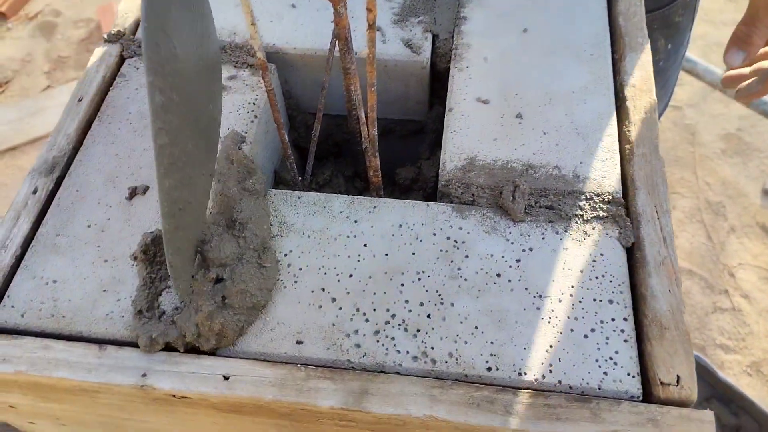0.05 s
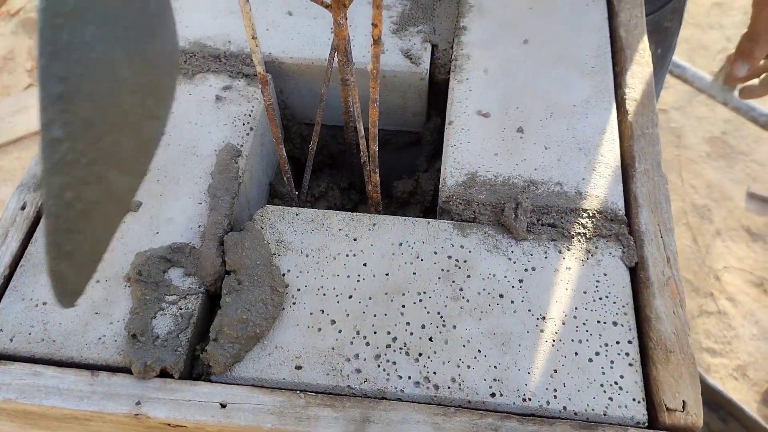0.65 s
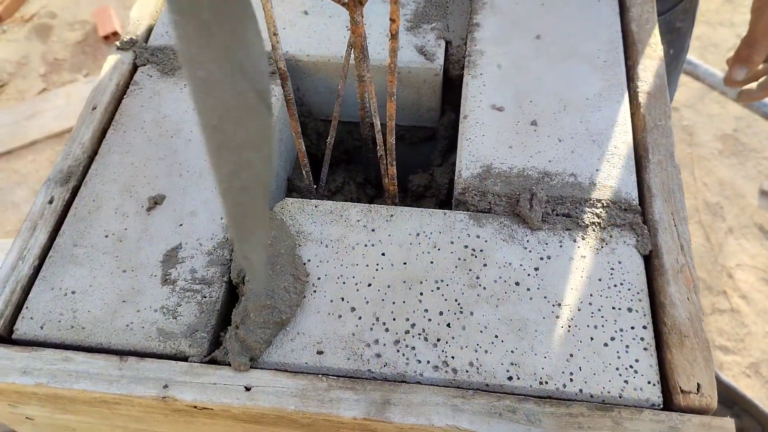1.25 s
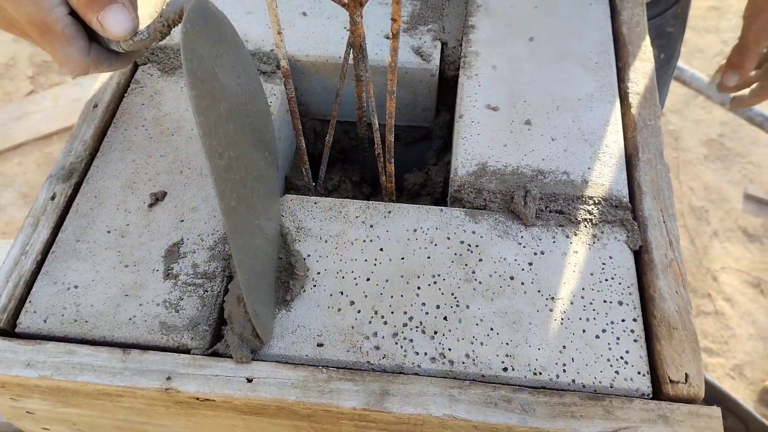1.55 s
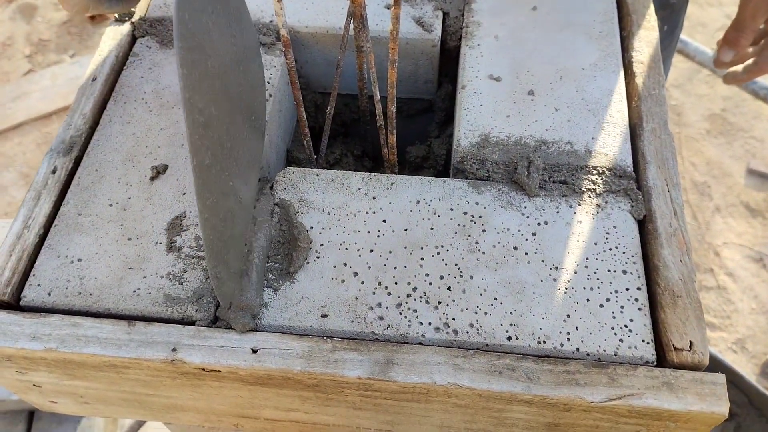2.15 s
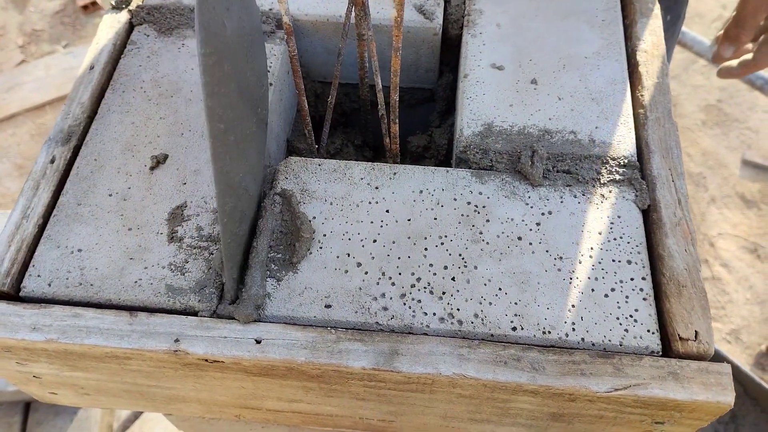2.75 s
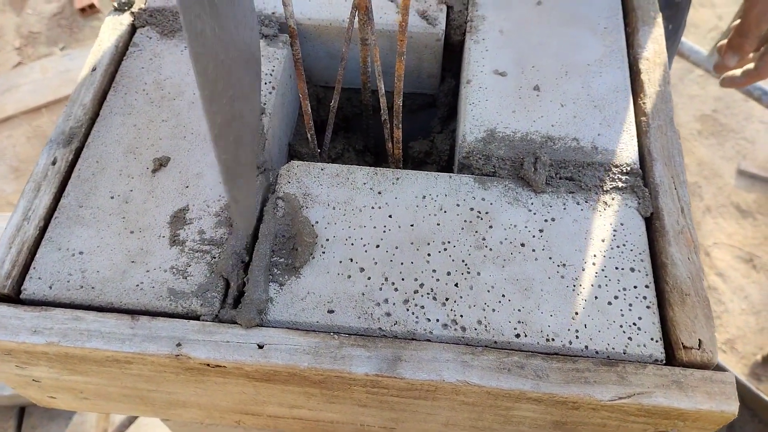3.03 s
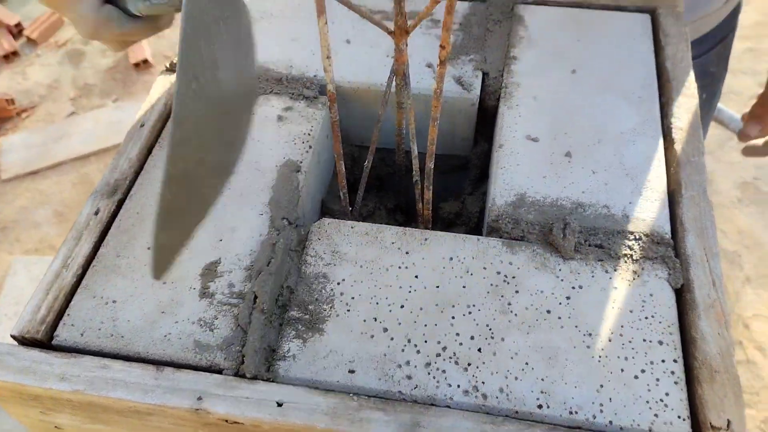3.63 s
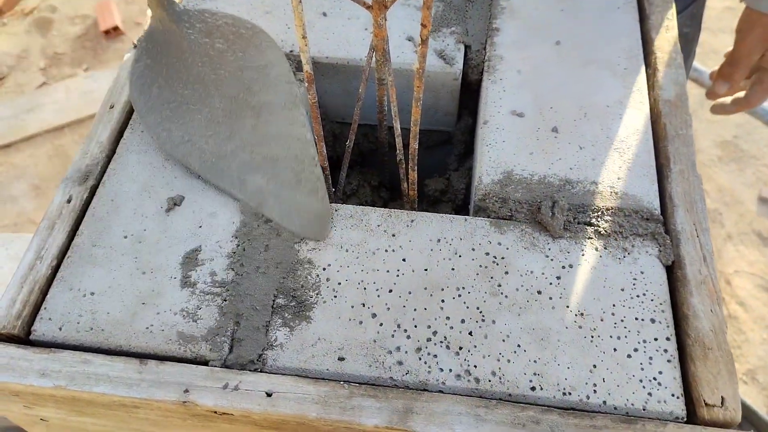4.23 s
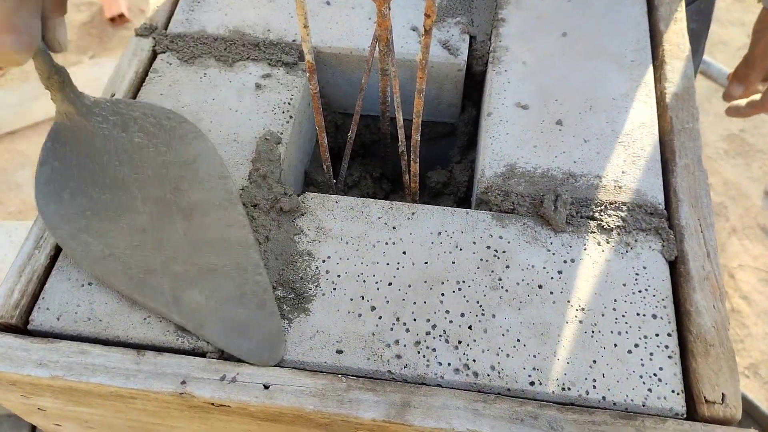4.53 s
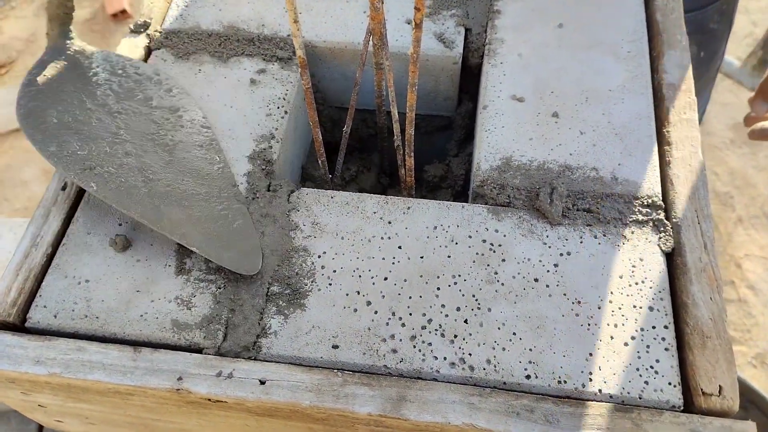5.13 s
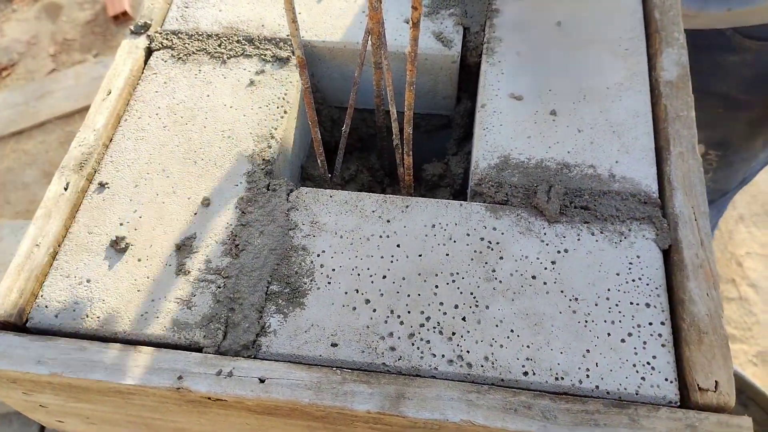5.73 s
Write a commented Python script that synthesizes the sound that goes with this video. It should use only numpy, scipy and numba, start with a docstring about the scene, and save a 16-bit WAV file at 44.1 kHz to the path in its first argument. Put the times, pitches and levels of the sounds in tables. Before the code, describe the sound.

Close, gritty scraping and wet chopping of a trowel working mortar between concrete blocks, its steel blade clinking and briefly ringing.

```python
"""Gritty scrapes, wet chops and steel clinks, close by: a trowel works mortar between two concrete blocks.
Its point chops and slices through the wet joint, then its long edge scrapes the dry block faces clean.
Sand catches under the steel and sets the blade ringing: damped while pressed down, freely once it lifts.
The hollow block knocks and resonates, a steel rod hums faintly near the end, and a light breeze blows."""
import sys
import numpy as np
from scipy import signal
from scipy.fft import rfft, irfft
from scipy.io import wavfile
from scipy.ndimage import uniform_filter1d, minimum_filter1d
from numba import njit

SR = 44100
rng = np.random.default_rng(int(sys.argv[2]) if len(sys.argv) > 2 else 0)


def waveform_to_disk(signal):
    """Save audio, clipped to [-1, 1], as 16-bit WAV at the path in sys.argv[1]."""
    frames = np.transpose(np.atleast_2d(signal))
    scaled = np.clip(frames, -1, 1) * 32767
    samples = np.round(scaled).astype(np.int16)
    wavfile.write(sys.argv[1], SR, samples)


N = 254879
TIME = np.arange(N) / SR

# ringing modes of the blade: pitch_hz, free_t60_s, point_contact_db, edge_contact_db
BLADE_MODES = [(1770, .23, -4, -3), (2400, .02, -28, -13), (2640, .1, -15, -17), (3650, .1, -20, -7.5),
               (4080, .08, -17, -20), (4700, .035, -23, -8), (5530, .06, -18, -9), (5960, .04, -24, -9),
               (7010, .06, -14, -1.5), (7330, .08, -11, -15), (8640, .05, -12, -5), (9230, .05, -11, -14),
               (10400, .06, -12, -9), (12480, .04, -18, -7), (12950, .025, -24, -11),
               (14450, .05, -18, -4.5)]
# the point chops into the joint and pulls out with a hiss:
# start_s, scrape_db, crunch_db, pull_db, pull_fall_s, wetness (0-1)
CHOPS = [(0.173, -23.5, -31.5, -43.5, 0.046, 0), (0.397, -30.5, -44.5, -63, 0.0089, 0.35),
         (1.362, -50, -29.5, -66, .02, 0.15), (1.768, -27, -43.5, -48, 0.09, 0.3),
         (1.98, -27, -49.5, -47, 0.029, 0.45), (2.197, -25.5, -35, -51, 0.058, 0.29),
         (2.382, -23.5, -44, -46, 0.08, 0.41), (2.6, -23, -38, -50, 0.15, 0.44),
         (2.762, -29.5, -43.5, -44, 0.032, 0.38)]
CHOP_RISE_S = 0.022
# the blade sweeps over mortar and block, swelling and then easing off:
# start_s, rise_s, fall_s, swell_db, sag_db, scrape_db, crunch_db, wetness (0-1)
SWEEPS = [(0.0, 0.0071, 0.073, 1, 12.5, -46, -56, 0.53), (0.093, 0.063, 0.033, 25, 10.5, -30.5, -47, 0.11),
          (0.469, .014, 0.052, 21.5, 35.5, -29.5, -37, 0.02),
          (0.713, 0.026, 0.032, 10, 26, -31.5, -28, 0.1), (0.794, 0.066, 0.098, 14.5, 24.5, -25, -23, 0),
          (0.96, 0.035, 0.041, -9, 1, -58, -71, 0.41), (1.265, 0.031, 0.02, -2.5, 20, -29.5, -39, 0.33),
          (1.432, 0.083, 0.054, 4.5, -1, -43.5, -41, 0.09), (1.58, 0.036, 0.021, -2, 9, -54.5, -81, 0.39),
          (3.17, 0.016, 0.049, -4, 8, -29.5, -34, 0.06), (3.233, 0.058, 0.078, 23, 27, -10, -23, 0.08),
          (3.359, 0.032, 0.13, 4.5, 36, -25, -24.5, 0.17),
          (3.475, 0.0073, 0.08, 12, 24.5, -27.5, -26, 0.38), (3.569, 0.038, 0.012, 8, 8, -38, -37.5, 0.43),
          (3.803, 0.055, 0.019, 25.5, 4, -40, -39, 0.94), (3.919, 0.0022, 0.033, -2, 8.5, -26, -37.5, 0.34),
          (3.959, 0.055, 0.051, 27, 15.5, -9, -38, 0.08), (4.051, 0.01, 0.084, 6, 14, -12, -44, 0.12),
          (4.158, 0.077, 0.055, -2, 1, -23, -63, 0.39), (4.485, 0.0029, 0.026, -13.5, 14, -42.5, -39, 0),
          (4.517, 0.053, 0.09, 8.5, 15.5, -12.5, -50, 0.11),
          (4.665, 0.0095, 0.08, -5, 16.5, -52.5, -52.5, 0.3),
          (4.84, 0.057, 0.0091, 5.5, 2.5, -9, -44.5, 0.15), (4.918, 0.026, 0.013, -4, 14, -20, -49, 0),
          (5.099, 0.0025, 0.012, 4, 14, -22.5, -41, 0.24),
          (5.124, 0.01, 0.062, 12.5, 28.5, -14.5, -44.5, 0)]


def from_db(db):
    """Decibels to gain."""
    return 10 ** (np.asarray(db) / 20)


def unit_power(x):
    """Scale to an RMS of 1."""
    return x / np.sqrt(np.mean(x ** 2) + 1e-20)


def smooth(x, decay_s):
    """One-pole lag: every click dies away with this time constant."""
    pole = np.exp(-1 / (decay_s * SR))
    return signal.lfilter([1 - pole], [1, -pole], x + 1e-18)


def drift(turns_per_s):
    """A random wander of unit power."""
    knots = rng.standard_normal(8192)
    return unit_power(np.interp(TIME * turns_per_s, np.arange(len(knots)), knots))


def colour(x, spectrum, size=4096):
    """Minimum-phase EQ through (freq_hz, level_db) points; white noise keeps its power."""
    hz, db = np.transpose(spectrum)
    grid_hz = np.maximum(np.arange(size // 2 + 1) * SR / size, 1)
    cepstrum = irfft(np.log(from_db(np.interp(np.log(grid_hz), np.log(hz), db))))
    causal = (np.arange(size) > 0) & (np.arange(size) < size // 2)
    response = irfft(np.exp(rfft(2 * cepstrum * causal)))
    return signal.fftconvolve(x, response / np.linalg.norm(response))[:N]


def clicks(times_s, levels_db):
    """One click at each time."""
    out = np.zeros(N)
    out[(np.asarray(times_s) * SR).astype(int)] = from_db(levels_db)
    return out


def grains(per_s, spread_db):
    """Random tiny fractures of uneven size, at unit power."""
    sizes = from_db(spread_db * np.minimum(rng.exponential(1, N), 4))
    return unit_power((rng.random(N) < per_s / SR) * sizes * rng.choice([-1, 1], N))


def stick_slip(per_s, spread_db, decay_s):
    """Friction catches and lets go: power comes in quickly dying bursts, even on average."""
    power = smooth(grains(per_s, spread_db) ** 2, decay_s)
    return power / (uniform_filter1d(power, size=900) + 0.35)


@njit
def resonate(force, width_hz, pitch_hz):
    """A mode whose bandwidth and pitch may change at every sample."""
    out, state = np.zeros(len(force)), 0j
    for i in range(len(force)):
        state = state * np.exp(np.pi * (2j * pitch_hz[i] - width_hz[i]) / SR) + force[i]
        out[i] = state.real - force[i] / 2   # keeps bass from leaking through
    return out


def outdoors():
    """A quiet open site: faint air, a light breeze and a few soft bumps on the microphone."""
    # wind rumble and air hiss: freq_hz, level_db
    wind_eq = [(15, 4), (30, 4), (60, -3.5), (180, -21), (400, -42.5), (2000, -91)]
    air_eq = [(100, -10.5), (800, -22.5), (3000, -29.5), (6500, -28), (15000, -33)]
    # soft bumps: start_s, level_db
    bump_hits = [(0.28, -42.5), (1.669, -43), (2.897, -41), (3.607, -37), (5.399, -34.5)]
    bump_s = 0.0032
    bumps = smooth(smooth(clicks(*np.transpose(bump_hits)), bump_s), bump_s) * np.e * bump_s * SR
    gusts = from_db(-55 + 3 * drift(14))
    rumble = (gusts + bumps) * colour(rng.standard_normal(N), wind_eq)
    return rumble + from_db(-67.5) * colour(rng.standard_normal(N), air_eq)


def reflections(x, t60_s=0.11, delay_s=0.003):
    """Nearby blocks and boards throw back a very short, faint wash."""
    response = rng.standard_normal(N) * from_db(-60 * TIME / t60_s) * (TIME > delay_s)
    return from_db(-23) * signal.fftconvolve(x, response / np.linalg.norm(response))[:N]


def rustle(peak_s=5.48, width_s=0.12):
    """A faint rustle swells and fades once the trowel is lifted away."""
    # tone of the rustle: freq_hz, level_db
    rustle_eq = [(500, 0.5), (3500, -10.5), (6700, 0.5), (10000, -12)]
    swell = np.exp(-((TIME - peak_s) / width_s) ** 2)
    return from_db(-62) * swell * colour(grains(per_s=12000, spread_db=4.0), rustle_eq)


def rod_hum(start_s=4.56):
    """A thin reinforcing rod hums faintly after a shove."""
    # bending modes: pitch_hz, t60_s, level_db
    rod_modes = [(480, 1.1, -55), (565, 1.0, -51)]
    age = np.maximum(TIME - start_s, 0)
    return sum(from_db(db - 60 * age / t60) * np.sin(2 * np.pi * hz * age) for hz, t60, db in rod_modes)


def block_cavity(force):
    """The hollow of the block rings briefly under whatever works on its face."""
    # cavity modes: pitch_hz, width_hz, level_db
    cavity_modes = [(373, 120, -12), (513.3, 160, -2.5), (790, 100, -4.5), (954, 140, -5.5),
                    (1243, 48, -8.5)]
    out = np.zeros(N)
    for hz, width, db in cavity_modes:
        ring = resonate(force, np.full(N, float(width)), np.full(N, float(hz)))
        out += from_db(db) * np.sqrt(4 * np.pi * width / SR) * ring
    return out


def block_thuds(decay_s=0.005):
    """Harder blows draw a dull knock from the block itself."""
    # blows: start_s, level_db
    blows = [(0.1913, -16), (0.423, 2.5), (0.477, -16.5), (1.377, -6), (2.207, -14), (3.2, -9),
             (3.254, -8.5)]
    # tone of the concrete: freq_hz, level_db
    block_eq = [(150, -20.5), (500, -7), (1150, 8), (1400, -6), (2500, -4), (6000, -36)]
    envelope = smooth(clicks(*np.transpose(blows)), decay_s) * decay_s * SR
    return from_db(-17) * colour(envelope * rng.standard_normal(N), block_eq)


def grinding(start_s=3.32, length_s=0.27):
    """Small stones in the mortar roll between the flat of the blade and the block in low, uneven lumps."""
    # tone of the grind: freq_hz, level_db
    grind_eq = [(50, -2.5), (150, -1), (600, -9.5), (2000, -29.5)]
    pressed = smooth(1.0 * ((TIME > start_s) & (TIME < start_s + length_s)), 0.003)
    lumps = np.sqrt(stick_slip(per_s=90, spread_db=3.0, decay_s=0.005))
    return from_db(-41) * colour(pressed * lumps * rng.standard_normal(N), grind_eq)


def stroke(start_s, rise_s, fall_s, swell_db, sag_db, land_s=0.0017):
    """One move of the hand: its samples, its effort in dB and its contact as the steel lands and lifts."""
    lift_s, margin_s = 0.0013, 0.06
    length_s = rise_s + fall_s
    first, last = int((start_s - margin_s) * SR), int((start_s + length_s + margin_s) * SR)
    span = np.arange(max(first, 0), min(last, N))
    age = TIME[span] - start_s
    effort_db = np.interp(age, [0, rise_s, length_s], [-swell_db, 0, -sag_db])
    contact = np.exp(np.minimum(age, 0) / land_s - np.maximum(age - length_s, 0) / lift_s)
    return span, effort_db, contact


def hand(release_s=0.00082, pull_after_s=0.081, crunch_follow=0.7):
    """Chops, pull-outs and sweeps add up to two envelopes: steel scrape and mortar crunch."""
    scrape, crunch = np.zeros((2, N))
    for start_s, scrape_db, crunch_db, pull_db, pull_fall_s, _ in CHOPS:
        span, effort_db, contact = stroke(start_s, CHOP_RISE_S, fall_s=0.047, swell_db=16, sag_db=19.5)
        scrape[span] += contact * from_db(scrape_db + effort_db)
        crunch[span] += contact * from_db(crunch_db + effort_db)
        span, effort_db, contact = stroke(start_s + pull_after_s, rise_s=0.048, fall_s=pull_fall_s,
                                          swell_db=6.5, sag_db=14.5)
        scrape[span] += contact * from_db(pull_db + effort_db)
    for *move, scrape_db, crunch_db, _ in SWEEPS:
        span, effort_db, contact = stroke(*move, land_s=0.00017)
        scrape[span] += contact * from_db(scrape_db + effort_db)
        crunch[span] += contact * from_db(crunch_db + crunch_follow * effort_db)
    return smooth(scrape, release_s), smooth(crunch, release_s)


def wetness():
    """Share of the blade that lies in wet mortar, gliding from one stroke to the next."""
    chops = [(start_s + CHOP_RISE_S, wet) for start_s, *_, wet in CHOPS]
    sweeps = [(start_s + rise_s, wet) for start_s, rise_s, *_, wet in SWEEPS]
    return np.clip(np.interp(TIME, *np.transpose(sorted(chops + sweeps))), 0, 1)


def mortar_squash(crunch):
    """Wet mortar squashes and crumbles in small clumps."""
    # tone of the mortar: freq_hz, level_db
    mortar_eq = [(60, -9.5), (150, -2), (450, -1), (1200, 2.5), (2000, -7.5), (3500, -7.5), (8000, -28.5)]
    clumps = np.sqrt(0.35 + 0.65 * stick_slip(per_s=200, spread_db=3.0, decay_s=0.0035))
    return colour(crunch * clumps * grains(per_s=1600, spread_db=3.5), mortar_eq)


def grain_cracks(crunch):
    """Single sand grains crack: a few coarse ones, and many small ones wherever mortar is squeezed."""
    # coarse grains: start_s, level_db
    coarse = [(1.463, -27), (1.54, -24), (1.552, -16), (3.394, -6), (3.411, -8), (3.446, -12), (3.487, 0),
              (4.452, -43), (5.739, -40)]
    # tone of a crack: freq_hz, level_db
    crack_eq = [(150, 8.5), (800, 15.5), (15000, 4.5)]
    small = from_db(-16) * crunch * grains(per_s=130, spread_db=3.5)
    return colour(clicks(*np.transpose(coarse)) + small, crack_eq)


def grit_clashes(decay_s=0.0015, attack_s=0.00073):
    """The steel jumps over coarse grains, each with a bright burst of noise."""
    # jumps: start_s, level_db
    skips = [(0.1805, -2), (0.1931, -1.5), (0.1992, -7), (0.4232, 9.5), (0.7128, -25), (0.795, -28),
             (0.828, -3.5), (0.8626, -7.5), (0.8743, -6), (0.893, -8), (0.91, -9), (0.926, -19),
             (0.9401, -11), (1.3005, -10.5), (1.3743, -7.5), (1.397, -32), (1.447, -37), (1.476, -18),
             (1.501, -16.5), (1.522, -17), (1.551, -17), (2.207, -7.5), (2.216, -3.5), (3.2635, -2.5),
             (3.275, 5), (3.283, 7.5), (3.2914, 3.5), (3.3075, 6.5), (3.331, 0.5), (3.35, -4),
             (3.985, -6.5), (4.014, -2.5), (4.036, -4.5), (4.063, 5.5), (4.106, -2.5), (4.161, -4.5),
             (4.182, -2), (4.223, -6), (4.271, -8), (4.53, 0.5), (4.5579, -0.5), (4.569, 0), (4.62, -0.5),
             (4.839, -11), (4.8515, 7), (4.893, 7), (4.9041, 16.5), (4.928, 7.5), (4.9418, 6), (5.136, 3.5),
             (5.1441, 8)]
    envelope = smooth(smooth(clicks(*np.transpose(skips)), decay_s), attack_s) * decay_s * SR
    return from_db(-3.5) * envelope * rng.standard_normal(N)


def sliding(scrape, pressure, wet):
    """In wet mortar the steel hisses smoothly; pressed on dry concrete it judders."""
    rough = 0.85 * pressure ** 0.6 * (1 - wet)
    judder = np.sqrt(1 - rough + rough * stick_slip(per_s=240, spread_db=3.3, decay_s=0.0018))
    return scrape * judder * grains(per_s=11000, spread_db=2.1)


def sand_rasp(force, bite, patchy_db=6.0):
    """Where the steel bites on dry concrete, every clump of grains crushes with a colour of its own."""
    # bands that flicker independently: edge_hz
    band_edges = [200, 2500, 4500, 6500, 8500, 10500, 13000, 17000]
    # tone of the sand: freq_hz, level_db
    sand_eq = [(300, -29.5), (1000, -19), (2000, -14.5), (3200, -15.5), (4300, 10.5), (6000, 10.5),
               (9000, 13.5), (12500, 12), (15500, 2.5)]
    out = np.zeros(N)
    spread = patchy_db * bite * np.log(10) / 20
    for low, high in zip(band_edges, band_edges[1:]):
        band = signal.sosfilt(signal.butter(2, [low, high], "band", fs=SR, output="sos"), force)
        flicker = np.exp(spread * drift(220) - spread ** 2)
        out = band * flicker - out   # alternating signs keep the crossovers even
    return colour(out, sand_eq)


def clinks(mode_hz, others_db=-18.0):
    """Knocks on concrete as one blade mode feels them: where the blade is hit decides which rings most."""
    # knocks: start_s, level_db, favoured_pitch_hz
    knocks = [(0.1933, -20, 1770), (0.196, -2.5, 7330), (0.4243, -9, 1770), (0.501, -28.5, 4080),
              (0.734, -29, 1770), (0.829, -20, 2640), (0.847, -36, 1770), (0.9407, -21, 2640),
              (1.38, -19, 4080), (2.212, -26, 2640), (3.173, -25.5, 2640), (3.274, -11.5, 1770),
              (3.284, -2.5, 1770), (4.002, -14.5, 1770), (4.063, -9, 2400), (4.522, -14.5, 1770),
              (4.531, 2, 4700), (4.559, -4.5, 3650), (4.944, -25.5, 1770), (5.139, 3.5, 7010),
              (5.146, -10, 3650), (5.158, -21.5, 1770)]
    start_s, level_db, favoured_hz = np.transpose(knocks)
    pitches = np.array(BLADE_MODES)[:, 0]
    nearest_hz = pitches[np.argmin(np.abs(favoured_hz[:, None] - pitches), axis=1)]
    return clicks(start_s, level_db + np.where(nearest_hz == mode_hz, 0, others_db))


def blade_ring(force, pressure, wet):
    """Rubbed and knocked, the steel rings; pressing stiffens and damps it, wet mortar smothers it."""
    on_edge = np.interp(TIME, [3.15, 4.2], [0, 1])   # the hand rolls the blade from point to edge
    lowest_hz, edge_trim_db = BLADE_MODES[0][0], -4.5
    out = np.zeros(N)
    for k, (hz, t60, point_db, edge_db) in enumerate(BLADE_MODES):
        free_width, contact_width = np.log(1000) / (np.pi * t60), 0.026 * hz
        smother_db = -24 * wet ** 2 - 22.5 * wet * (lowest_hz / hz) ** 4   # mortar holds low modes most
        gain = from_db(point_db + on_edge * (edge_db + edge_trim_db - point_db) + smother_db)
        travel = from_db(3 * drift(110))   # the moving contact favours now one mode, now another
        rubbed = gain * force * travel * np.sqrt(4 * np.pi * (free_width + contact_width) / SR)
        pitch = hz + pressure * (30 + 0.3 * np.sqrt(hz) * (drift(15) + 2 * drift(120)))
        width = free_width + pressure * contact_width + 220 * wet ** 2
        out += resonate(rubbed + (-1) ** k * clinks(hz), width, pitch)
    return out


def scene():
    """Grit is heard directly and through the blade, over the crunch of the mortar; mono."""
    scrape, crunch = hand()
    wet = wetness()
    pressure = np.clip(scrape / from_db(-18), 0, 1) ** 0.42
    clash = grit_clashes()
    thuds = block_thuds()
    friction = sliding(scrape, pressure, wet)
    # crushed grit shakes the high modes most
    bright_clash = signal.sosfilt(signal.butter(2, 3400, "high", fs=SR, output="sos"), clash)
    steel = from_db(-2) * blade_ring(friction + bright_clash, pressure, wet)
    sand = from_db(-6.5) * sand_rasp(friction + clash, bite=pressure * (1 - wet))
    face_force = (crunch + from_db(-18) * scrape) * grains(per_s=1300, spread_db=5.0)
    cavity = from_db(-14) * block_cavity(face_force)
    mortar = from_db(-10) * mortar_squash(crunch)
    cracks = from_db(2.5) * grain_cracks(crunch)
    work = cavity + steel + sand + mortar + cracks + thuds + grinding()
    return (work + reflections(work) + rustle() + rod_hum() + outdoors())[None]


def record(dry, cutoff_hz=15750):
    """A fast limiter holds down the loudest peaks, then a steep low-pass cuts the top."""
    allowed_gain = 1 / np.maximum(np.abs(dry), 1)
    gain = uniform_filter1d(minimum_filter1d(allowed_gain, size=31), size=31)
    return signal.sosfilt(signal.ellip(12, 0.1, 80, cutoff_hz, fs=SR, output="sos"), gain * dry)


dry = scene()
out = record(dry)
waveform_to_disk(out)
```